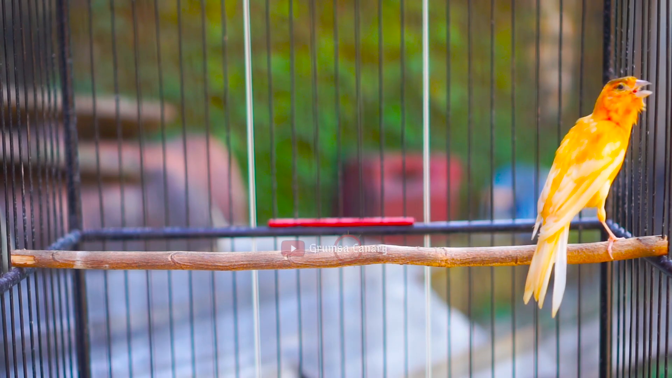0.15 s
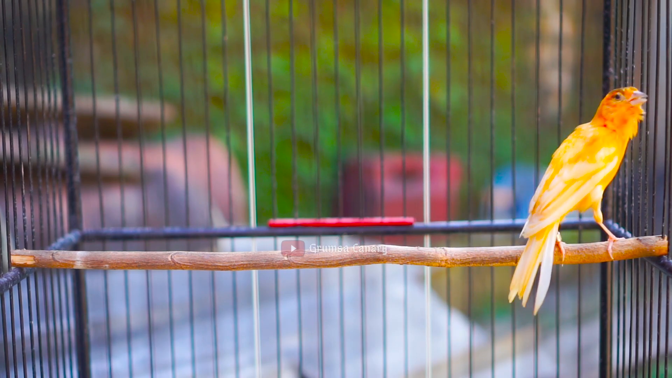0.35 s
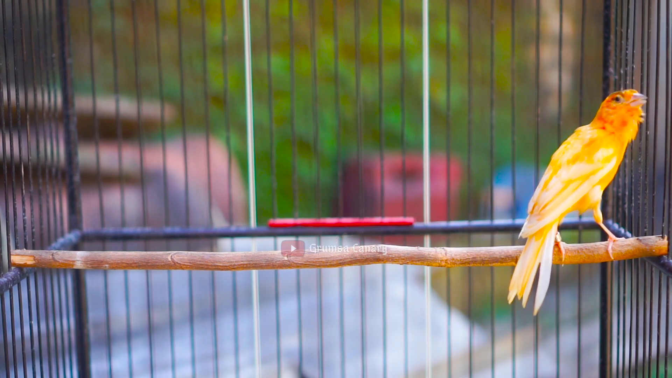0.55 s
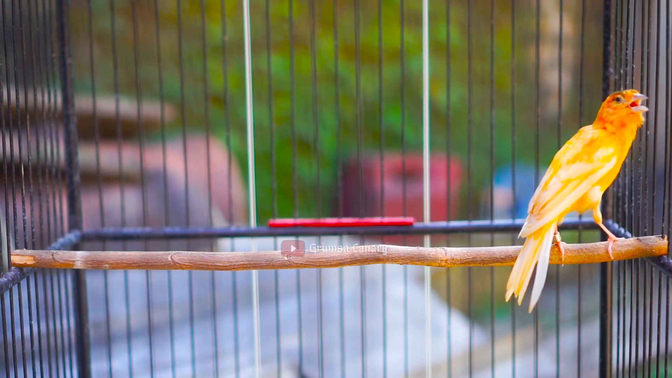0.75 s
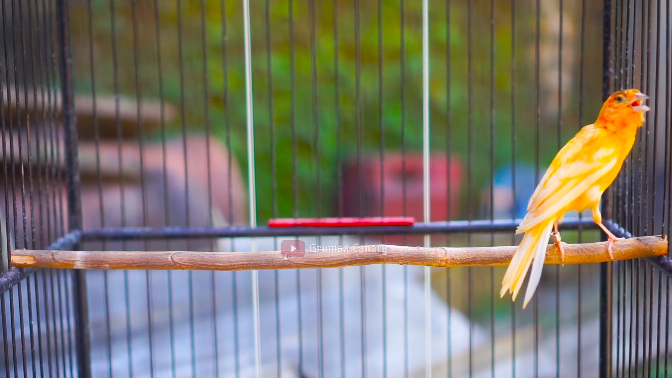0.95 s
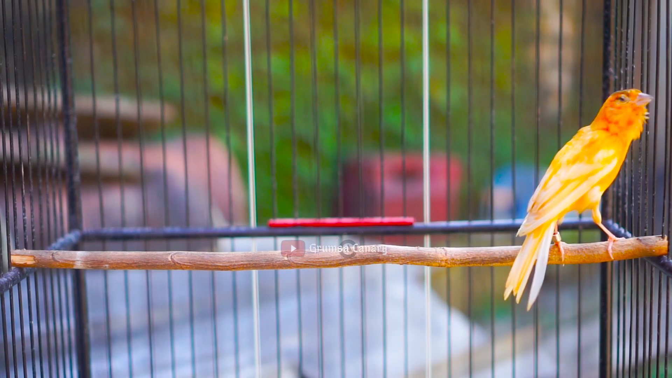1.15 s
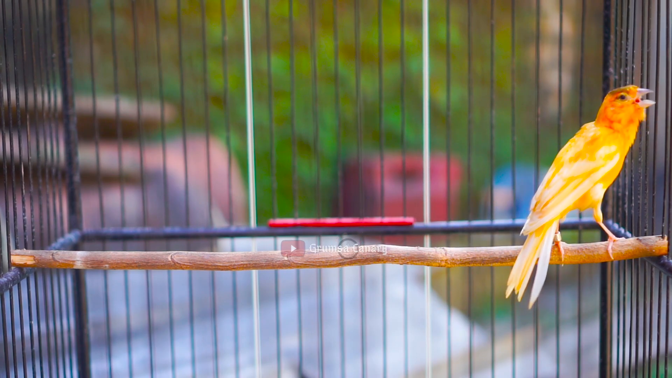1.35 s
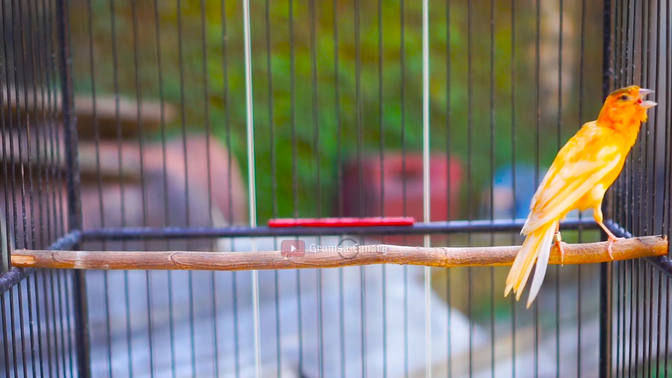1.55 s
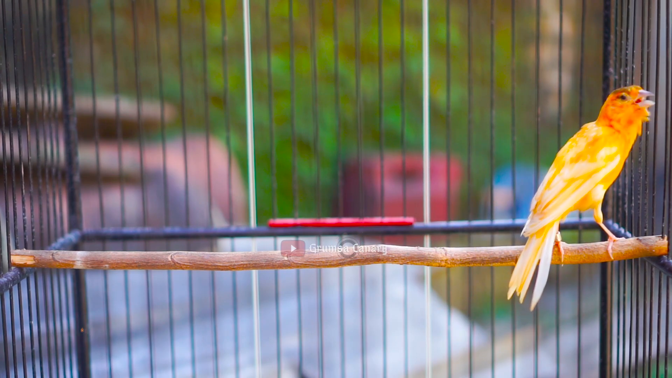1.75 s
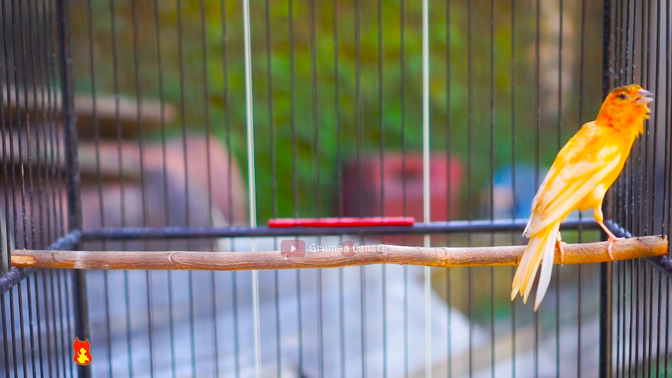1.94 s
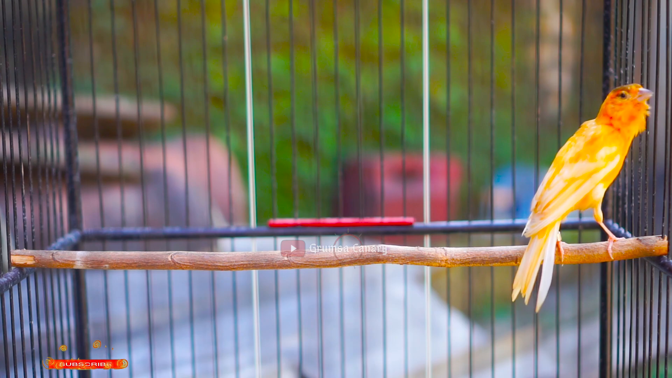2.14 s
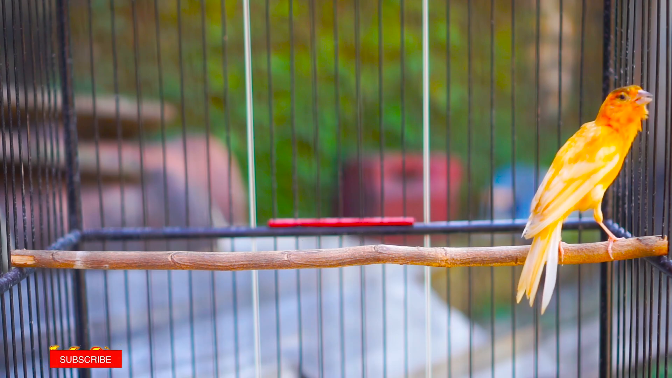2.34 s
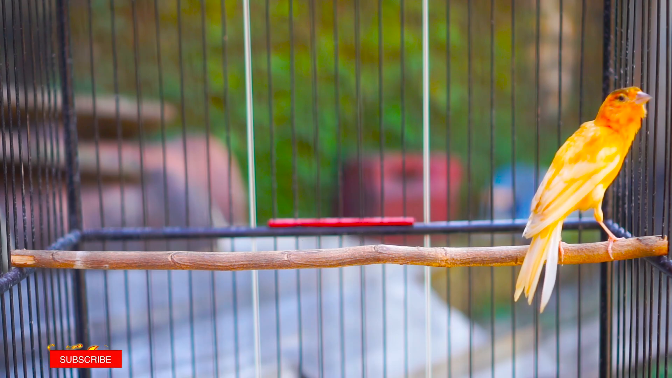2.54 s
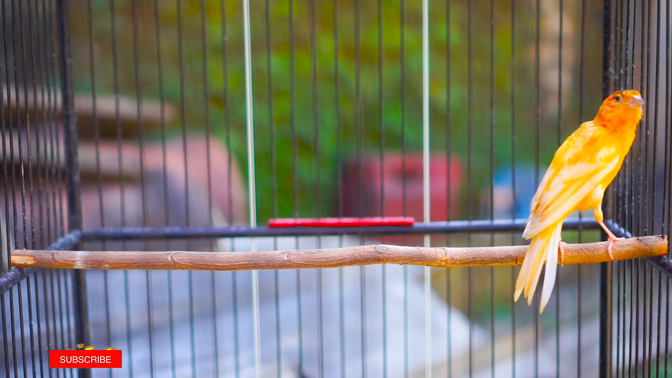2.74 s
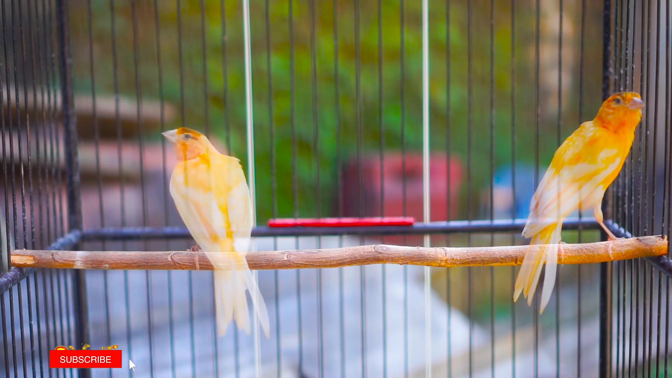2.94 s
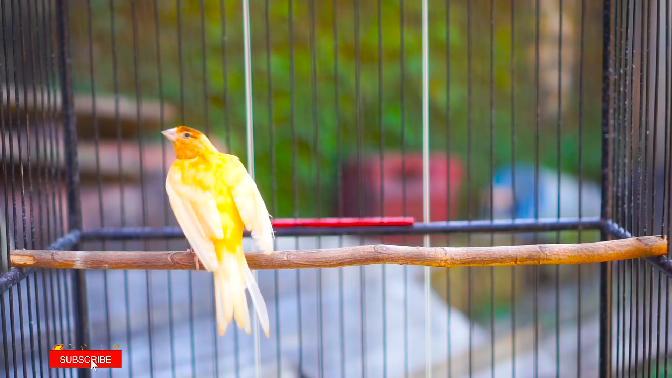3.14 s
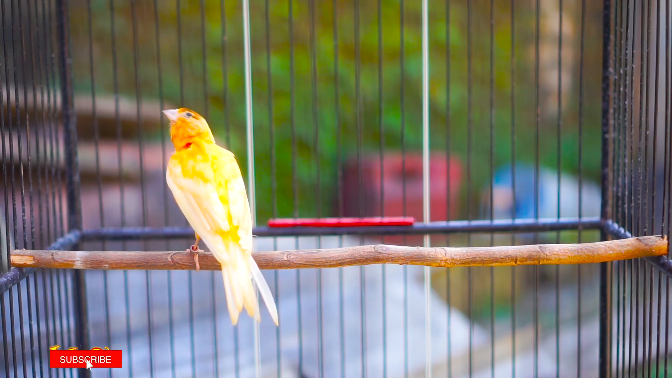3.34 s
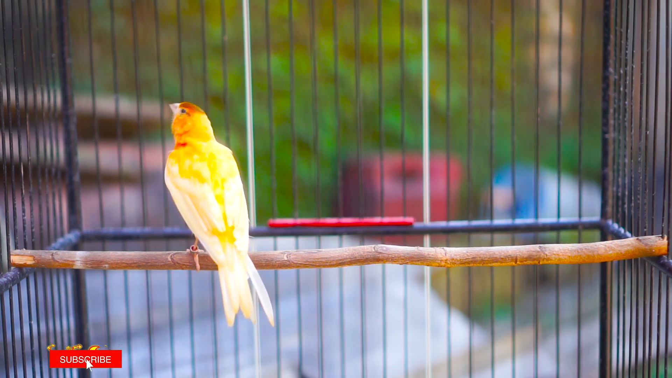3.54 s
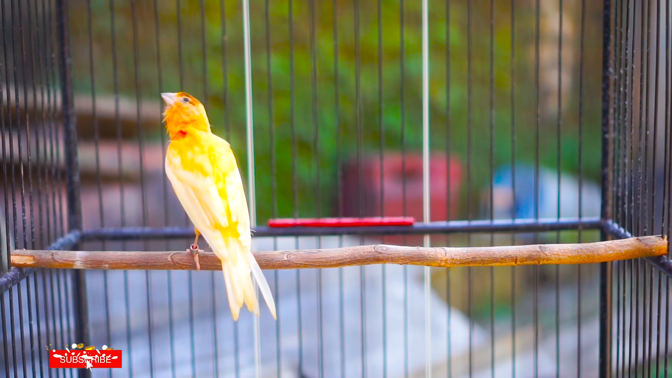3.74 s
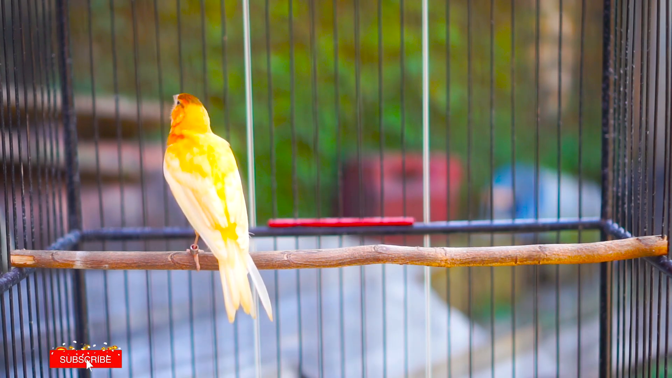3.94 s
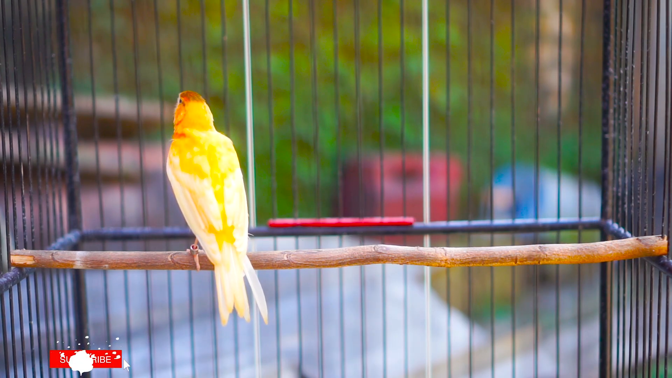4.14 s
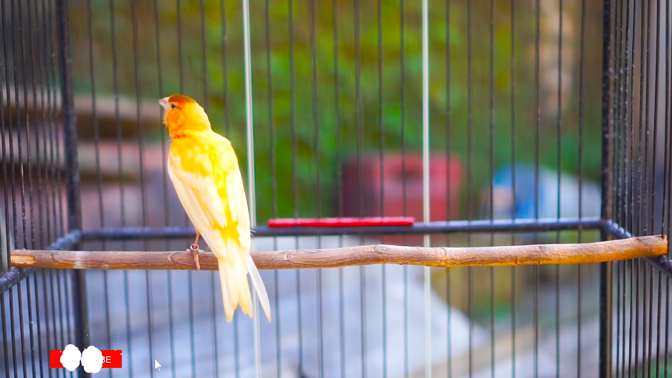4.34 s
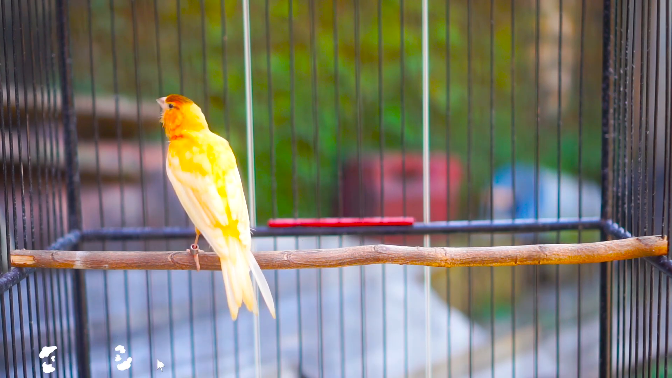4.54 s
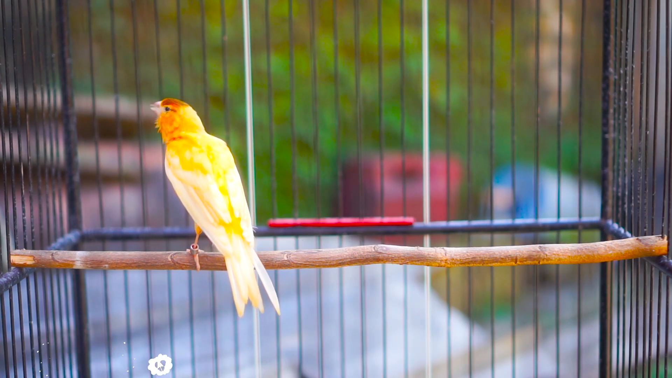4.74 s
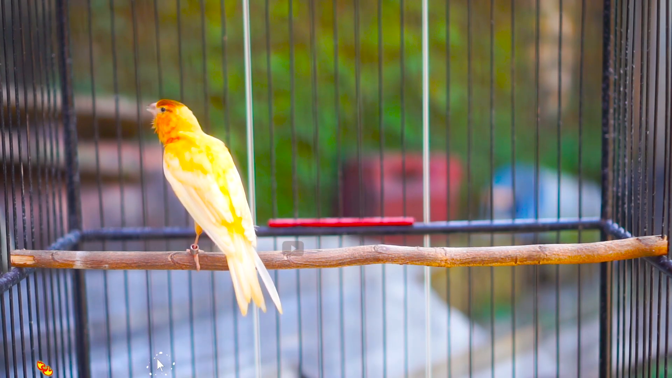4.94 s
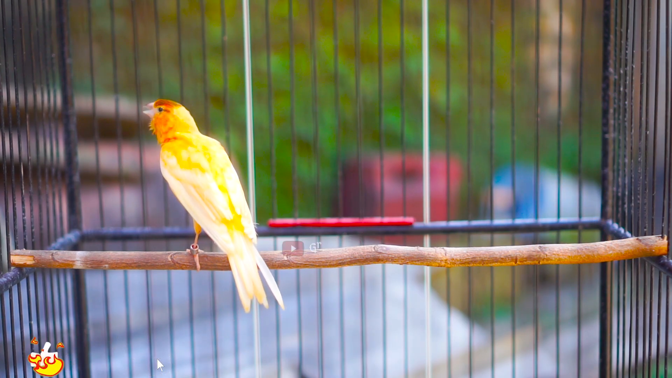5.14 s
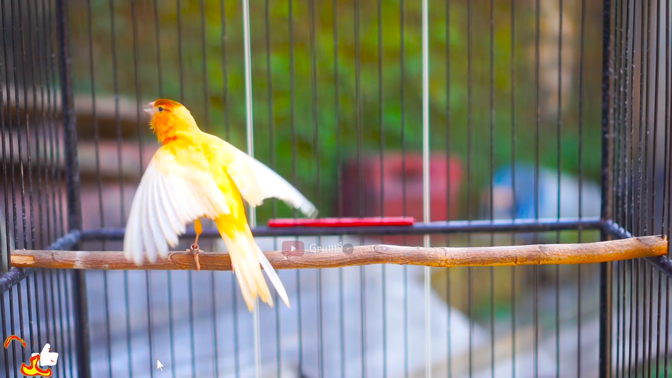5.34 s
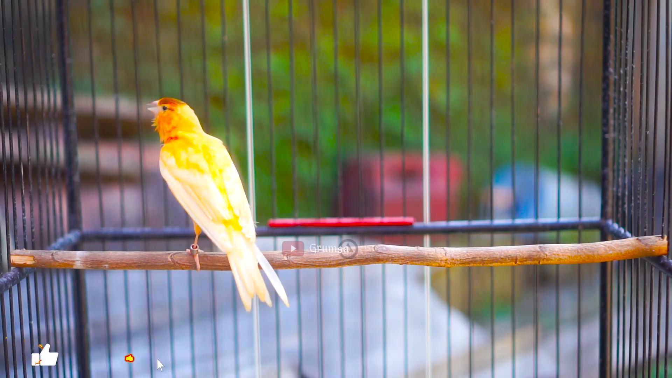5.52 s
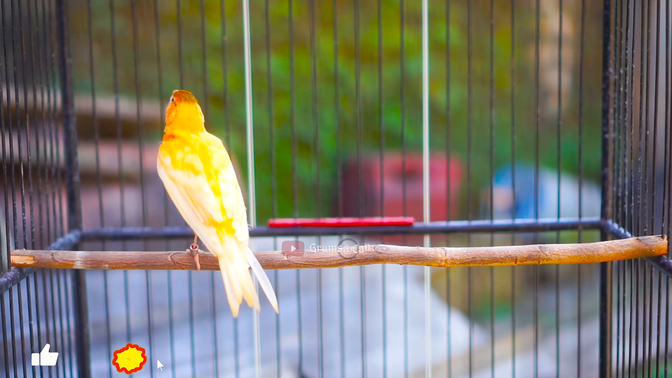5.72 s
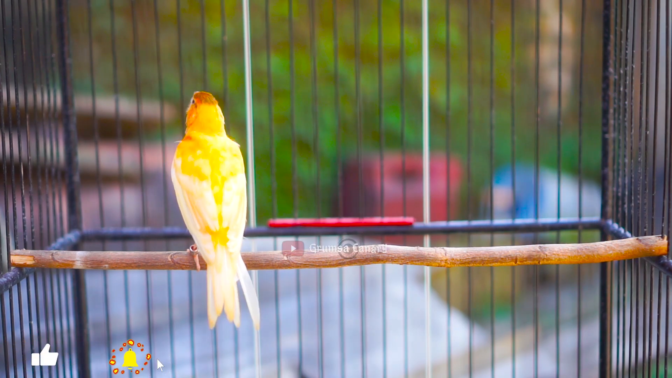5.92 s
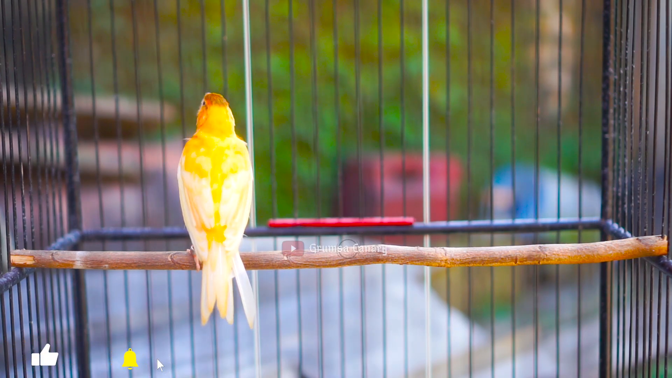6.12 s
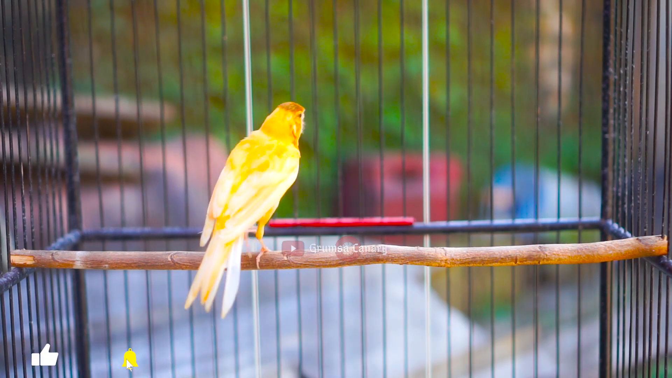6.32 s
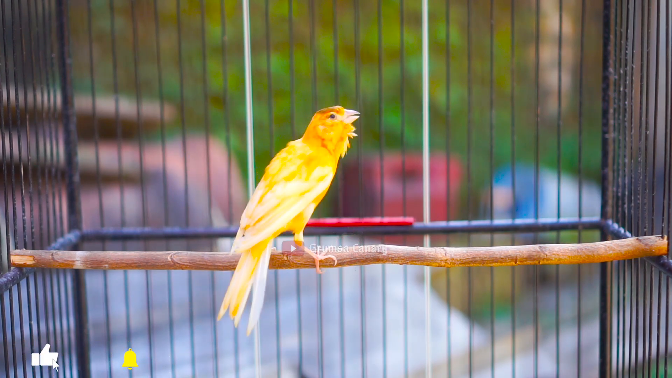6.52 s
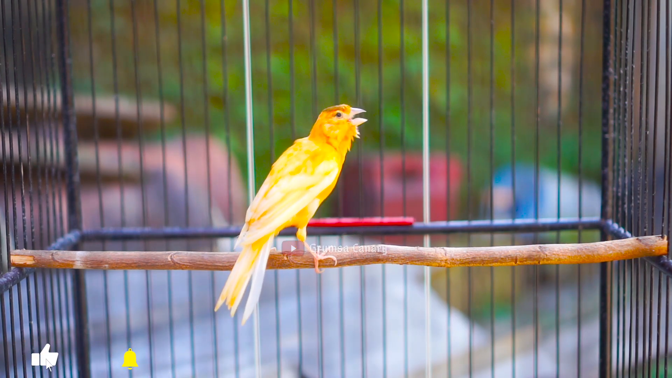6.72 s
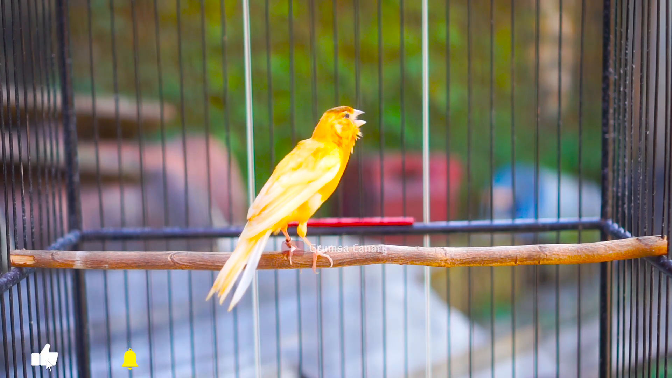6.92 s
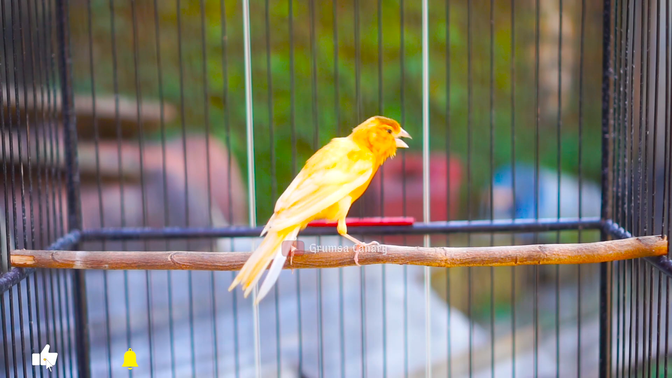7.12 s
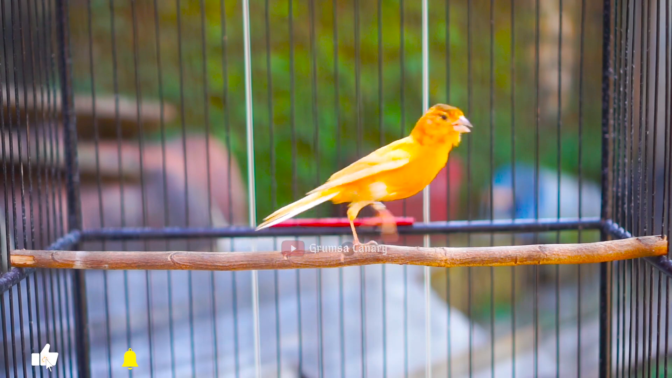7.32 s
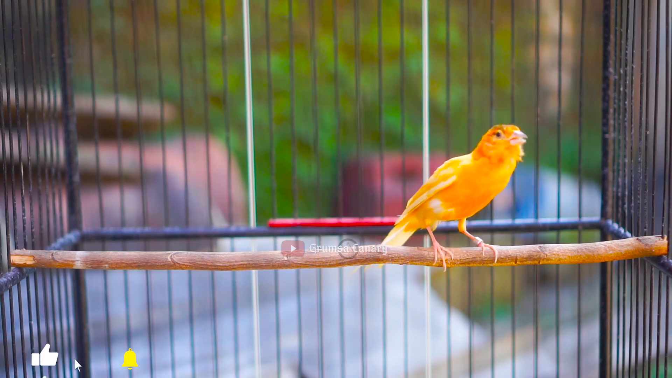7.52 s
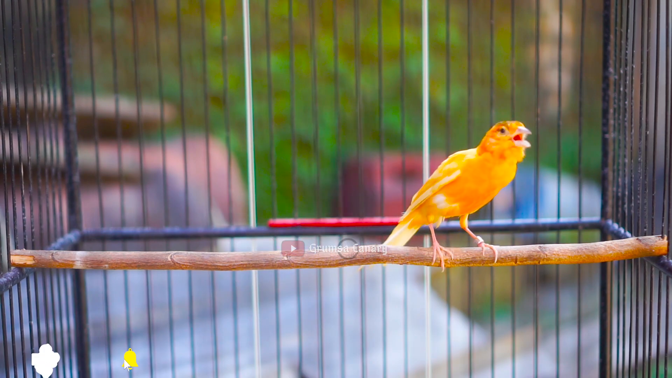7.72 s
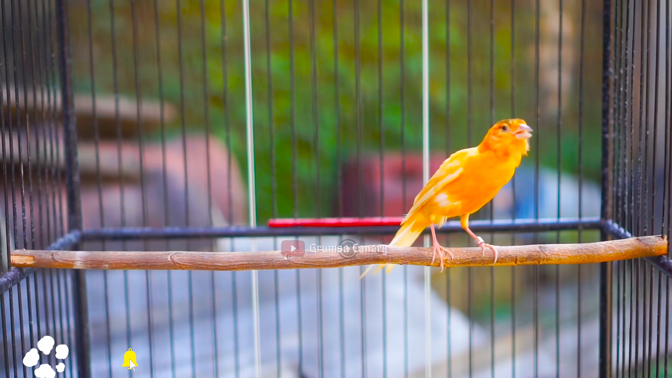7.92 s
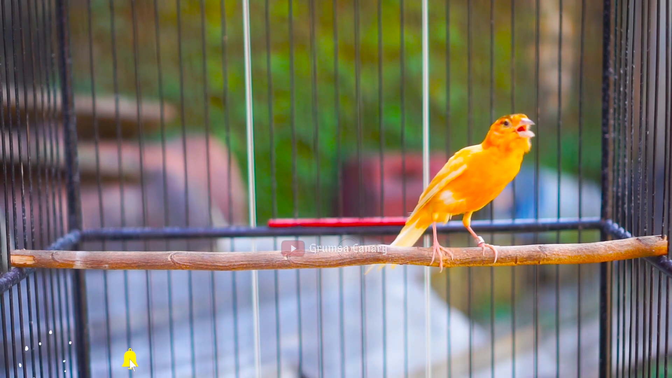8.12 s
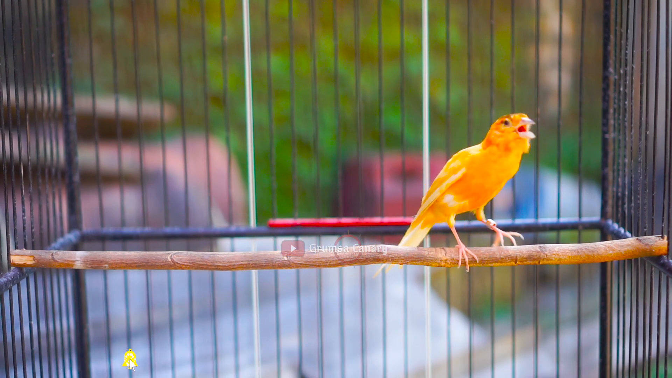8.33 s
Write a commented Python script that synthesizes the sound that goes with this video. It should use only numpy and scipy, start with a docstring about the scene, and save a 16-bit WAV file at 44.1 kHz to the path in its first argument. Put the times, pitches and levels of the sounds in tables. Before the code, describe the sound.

A canary close by sings loud, fast trills of falling chirps, pauses, then swells through a rapid ticking roll back into bright falling trills.

```python
"""Caged canary with a far bird

A caged canary sings close by: trills of falling sweeps, long slurs and rising whistles, a pause, then a
swelling roll of rising ticks and the falling trills again. Each syllable is a gliding sine with weak overtones,
comb-filtered by near reflections and convolved with decaying noise for the room. Another bird calls far off,
heard only as reverberation, over shaped noise: low rumble, hums, air, hiss and a passing rustle."""
import sys
import numpy as np
from scipy import signal
from scipy.fft import rfft, irfft, next_fast_len
from scipy.io import wavfile
from scipy.ndimage import uniform_filter1d, minimum_filter1d, map_coordinates

SR = 44100
rng = np.random.default_rng(int(sys.argv[2]) if len(sys.argv) > 2 else 0)


def digitize_waveform(pressure):
    """Quantize a signal to 16-bit integers and store it at the path in sys.argv[1].

    Rows of a 2-D input are taken as channels; values are limited to [-1, 1].
    """
    field = np.atleast_2d(pressure).T
    bounded = np.clip(field, -1, 1)
    quanta = np.round(bounded * 32767).astype(np.int16)
    wavfile.write(sys.argv[1], SR, quanta)


N = 369116


def canary():
    """Each posture aims the beak differently: its own balance, brightness and reflections."""
    # postures: (start [s], left-right [dB], greatest left-ear phase lead [rad], overtones [dB], room [dB])
    postures = [(0, -9, 0.67, -0.5, -12), (2.9, -2, 1.57, -8.5, -13), (5.46, -2.5, 1.27, 3, -12),
                (7.2, -5.5, 0.9, 2.5, -15)]
    # three near reflections per posture, one table per ear: (delay [ms], share) three times
    echoes_left = [(2.655, 0.17, 2.3, 0.079, 1.56, 0.16), (2.036, 0.45, 3.155, 0.1, 1.355, 0.13),
                   (1.535, 0.23, 1.8, 0.37, 0.975, 0.08), (0.89, 0.31, 1.56, 0.22, 2.3, 0.11)]
    echoes_right = [(1.55, 0.34, 2.93, 0.2, 0.995, 0.13), (2.05, 0.55, 1.24, 0.12, 3.215, 0.14),
                    (1.535, 0.38, 1.8, 0.49, 2.615, 0.082), (1.555, 0.26, 0.9, 0.13, 2.3, 0.2)]

    tone, overtones = song()
    t_s = np.arange(N) / SR
    # postures hand over within 10 ms
    begun = [1] + [np.clip((t_s - row[0]) * 100, 0, 1) for row in postures[1:]] + [0]
    direct, into_room, balance = 0, 0, 0
    for k, (_, pan_db, lead_rad, overtone_db, room_db) in enumerate(postures):
        share = begun[k] - begun[k + 1]
        voice = (tone + from_db(overtone_db) * overtones) * share
        left = near_echoes(voice, echoes_left[k], 0)
        right = near_echoes(voice, echoes_right[k], lead_rad)
        direct = direct + np.stack([left, right])
        into_room = into_room + from_db(room_db) * voice
        ears = from_db([[pan_db / 2], [-pan_db / 2]])
        balance = balance + share * ears / np.sqrt(np.mean(ears ** 2))
    reverb = room(into_room, early_t60_s=0.11, late_t60_s=0.33, late_db=-13.5, gap_s=0.0038)
    return balance * (direct + reverb)


def song():
    """Sing every phrase, tone and overtones apart; held whistles are steadier than sweeps."""
    # syllable gestures: (time from the syllable's centre [ms], pitch [Hz], level [dB])
    chip = [(-37, 6650, -48), (-32.5, 6410, -35.5), (-26.5, 5540, -17.5), (-18, 4806, -11.5),
            (-10.5, 4400, -11.5), (0, 3853, -1.5), (5.5, 3463, 0.5), (9.5, 3229, -6.5), (13, 3090, -24),
            (20, 3100, -40)]
    sweep = [(-58, 6200, -40), (-51.5, 7540, -35), (-44, 6550, -28.5), (-37.5, 6110, -17), (-25, 5320, -16),
             (-15.5, 4713, -16.5), (-7.5, 4476, -1), (0.5, 3980, -1), (8.5, 3480, -6), (16.5, 3090, -7.5),
             (24, 2690, -12.5), (28.5, 2614, -21.5), (33, 2560, -36.5)]
    swoop = [(-122, 7650, -40.5), (-108, 7340, -27), (-82, 7120, -21), (-56, 6450, -16.5),
             (-35.5, 5680, -9.5), (-10.5, 4600, -2), (2.5, 3890, -0.5), (8.5, 3330, -4.5),
             (13.5, 3177, -11), (24, 3000, -34.5)]
    slur = [(-163, 7750, -47.5), (-146, 7600, -28.5), (-118, 7100, -16.5), (-82.5, 6580, -12.5),
            (-42, 5850, -13), (-24.5, 5130, -2.5), (-10.5, 4570, -1), (0, 3860, 1.5), (6.5, 3310, -3.5),
            (11.5, 3134, -14), (23.5, 3090, -38.5)]
    lift = [(-30.5, 2950, -27), (-20.5, 3320, -3), (-9.5, 3720, -5.5), (2.5, 4120, -0.5), (18, 4530, -2.5),
            (40, 4830, -11), (69.5, 5060, -18.5), (95, 5250, -26.5), (119, 5300, -42)]
    whistle = [(-59.5, 1900, -36), (-47, 2430, -24.5), (-36.5, 3030, -10), (-18.5, 3610, -5),
               (1, 4080, -2.5), (22, 4450, -5.5), (38.5, 4730, -1), (57, 4990, -10.5), (108, 5050, -8),
               (136, 5070, -16.5), (152.5, 5040, -29.5)]
    tick = [(-19.5, 1800, -36), (-12, 2820, -26), (-6, 3350, -3.5), (0.5, 3877, 2.5), (4, 4394, -3),
            (8, 4550, -7.5), (11, 4650, -30)]
    pip = [(-29.5, 1500, -49.5), (-18.5, 2830, -33), (-10.5, 3330, -11), (-7, 3680, -5.5), (-0.5, 4200, 0),
           (5, 4480, 3.5), (8, 4625, -2.5), (12, 4550, -25.5)]
    # syllables sung singly: (centre [s], level [dB], length [share of the gesture's])
    swoops = [(1.5258, -6, 1.0), (8.007, -5.5, 0.89)]
    slurs = [(1.747, -7.5, 1), (8.2252, -6.5, 0.99), (8.438, -4, 0.99)]
    lifts = [(1.825, -11.5, 1)]
    whistles = [(2.0343, -10.5, 0.94), (2.271, -9, 0.97)]
    # trills and rolls: (time [s], syllable spacing [ms], level [dB], length [share of the gesture's])
    opening_chips = [(0.043, 75, -5.5, 1.02), (0.4291, 78.8, -5, 0.94)]
    opening_sweeps = [(0.521, 103.3, -7, 0.74), (0.735, 112.2, -5, 1), (1.092, 126.9, -5, 0.98),
                      (1.335, 118.2, -5, 1)]
    tick_roll = [(3.397, 35.2, -49, 1.0), (3.44, 35.34, -37, 0.98), (3.6, 35.34, -28, 0.9),
                 (3.93, 35.71, -18, 0.62), (4.33, 38.87, -18.5, 0.8), (4.5, 43.76, -16.5, 0.85),
                 (4.735, 46.76, -14, 0.95)]
    pip_roll = [(4.785, 44.77, -13.5, 0.85), (4.88, 54.86, -12, 0.84), (5.05, 57.2, -11, 0.87),
                (5.3996, 58.3, -10.5, 0.93)]
    closing_chips = [(5.536, 78.35, -12, 1.07), (5.69, 75.17, -6.5, 0.98), (6.2, 74.54, -4.5, 1.02),
                     (6.843, 81.23, -4, 1.023)]
    closing_sweeps = [(6.9257, 99, -4, 0.83), (7.17, 117.5, -4, 1.014), (7.38, 112, -4.5, 0.99),
                      (7.8323, 118.1, -5, 1.04)]

    # pitch waver and spread as shares of the pitch
    chipping = dict(waver=0.008, flutter_db=1.26, spread=0.01, second_db=8.5)
    falling = dict(waver=0.0059, flutter_db=1.17, spread=0.0052, second_db=1.5)
    held = dict(waver=0.0017, flutter_db=1.0, spread=0.00091, second_db=2.0)
    rolling = dict(waver=0.006, flutter_db=0.77, spread=0.009, second_db=21.5)
    # (gesture, syllables, manner, overtones [dB])
    phrases = [
        (chip, trill(opening_chips), chipping, -4),
        (sweep, trill(opening_sweeps), falling, 1),
        (swoop, swoops, falling, 4),
        (slur, slurs, falling, 4),
        (lift, lifts, held, 1),
        (whistle, whistles, held, 4),
        (tick, trill(tick_roll), rolling, -6.5),
        (pip, trill(pip_roll), rolling, -7.5),
        (chip, trill(closing_chips), chipping, -1.5),
        (sweep, trill(closing_sweeps), falling, -1),
    ]
    tone, overtones = np.zeros(N), np.zeros(N)
    for gesture, notes, manner, bright_db in phrases:
        for centre_s, db, stretch in notes:
            start = round((centre_s + stretch * gesture[0][0] / 1000) * SR)
            pure, bright = syllable(gesture, stretch, **manner)
            add(tone, start, from_db(db) * pure)
            add(overtones, start, from_db(db + bright_db) * bright)
    return tone, overtones


def trill(rows):
    """Repeat a syllable at a smoothly changing pace: (centre s, level dB, length share) for each one."""
    uneven_db, uneven_length = 0.5, 0.015  # chance differences between syllables
    s, spacing_ms, db, length = np.transpose(rows)
    t_s = np.linspace(s[0], s[-1], num=2000)
    # syllables counted so far: the integral of the pace
    beats = np.cumsum(1000 * (t_s[1] - t_s[0]) / np.interp(t_s, s, spacing_ms))
    whole_beats = np.linspace(beats[0], beats[-1], round(beats[-1]) + 1)
    centres_s = np.interp(whole_beats, beats, t_s)
    chance = rng.standard_normal((len(centres_s), 2))
    levels_db = np.interp(centres_s, s, db) + uneven_db * chance[:, 0]
    lengths = np.interp(centres_s, s, length) * (1 + uneven_length * chance[:, 1])
    return np.column_stack([centres_s, levels_db, lengths])


def syllable(gesture, stretch, waver, flutter_db, spread, second_db):
    """One glide of the syrinx, never twice quite the same: its tone and its overtones."""
    # relative levels of the syrinx's overtones from the second harmonic up: (level [dB])
    overtone_levels = [-37, -31, -42, -47.5]
    # how the open beak radiates overtones: (frequency [Hz], gain [dB])
    beak = [(4000, -29.5), (7800, -28.5), (9200, -14.5), (10400, -7), (12500, 0.5), (14000, 0.5),
            (15300, 4)]

    ms, hz, db = np.transpose(gesture)
    t_ms = np.arange(ms[0], ms[-1], 1000 / SR / stretch)  # gesture time, before stretching
    size = len(t_ms)
    pitch_hz = uniform_filter1d(np.interp(t_ms, ms, hz), size=90, mode="nearest")
    pitch_hz = pitch_hz * (1 + spread * rng.standard_normal() + waver * wander(size, 220))
    # the valve opens and shuts smoothly
    opening = signal.windows.tukey(size, 220 / size)
    level_db = np.interp(t_ms, ms, db) + flutter_db * wander(size, 154.3)
    level = opening * uniform_filter1d(from_db(level_db), size=110)
    phase = 2 * np.pi * np.cumsum(pitch_hz) / SR
    overtones = 0
    for k, overtone_db in enumerate(overtone_levels, 2):
        extra_db = second_db if k == 2 else 0
        gain = from_db(overtone_db + extra_db + at_hz(beak, k * pitch_hz) + 4 * wander(size, 133.9))
        below_nyquist = np.interp(k * pitch_hz, [17000, 21000], [1, 0])
        overtones = overtones + gain * below_nyquist * np.sin(k * phase)
    return level * np.sin(phase), level * overtones


def near_echoes(x, echoes, lag_rad):
    """The path to one ear: reflections a few ms late beat against the glide and cut each syllable into lobes."""
    # interaural phase, strongest in the song's range: (frequency [Hz], share of lag_rad)
    lead_shape = [(1000, 0.74), (3300, 0.99), (4500, 0.92), (6000, 0.88), (11000, 0.45)]

    size = next_fast_len(N + 1024)
    hz = np.fft.rfftfreq(size, 1 / SR)
    turn_per_ms = -2j * np.pi * hz / 1000
    pairs = np.reshape(echoes, (-1, 2))
    comb = 1 + sum(share * np.exp(turn_per_ms * delay_ms) for delay_ms, share in pairs)
    lag = np.exp(-1j * lag_rad * at_hz(lead_shape, hz))
    heard = irfft(rfft(x, size) * comb * lag, size)[:N]
    return heard / np.sqrt(1 + np.sum(pairs[:, 1] ** 2))


def room(x, early_t60_s, late_t60_s, late_db, gap_s):
    """Dense quick reflections, then a weaker, longer tail; each ear has its own decaying noise."""
    # room's response: (frequency [Hz], gain [dB])
    room_colour = [(2000, 4), (3200, 3), (4500, 1), (6000, 4), (9000, 5.5), (12000, 7.5), (16000, 7)]

    t_s = np.arange(SR // 2) / SR
    decay = from_db(-60 * t_s / early_t60_s) + from_db(late_db - 60 * t_s / late_t60_s)
    response = rng.standard_normal((2, len(t_s))) * decay * (t_s > gap_s)
    response /= np.sqrt(np.sum(response ** 2, axis=1, keepdims=True))  # unit energy
    return signal.fftconvolve(colour(x, room_colour)[None], response, axes=1)[:, :N]


def far_bird():
    """Falling whistles that arrive only as reverberation."""
    # calls: (start [s], end [s], first pitch [Hz], last pitch [Hz], level into the room [dB])
    far_calls = [(2.3, 2.8, 2800, 2680, -64.5), (3.048, 3.113, 4980, 2740, -59.5),
                 (3.163, 3.235, 4870, 2810, -61), (3.288, 3.357, 4800, 2820, -58.5),
                 (5.989, 6.314, 3105, 2780, -48.5), (6.862, 7.104, 2664, 2090, -46),
                 (7.115, 7.36, 2860, 2400, -41), (7.295, 7.6, 2340, 1963, -56)]

    calls = np.zeros(N)
    for start_s, end_s, first_hz, last_hz, db in far_calls:
        size = max(int((end_s - start_s) * SR), 2)
        pitch_hz = np.linspace(first_hz, last_hz, size) * (1 + 0.027 * wander(size, 150))
        whistle = signal.windows.tukey(size, 0.5) * np.sin(2 * np.pi * np.cumsum(pitch_hz) / SR)
        add(calls, int(start_s * SR), from_db(db) * whistle)
    return room(calls, early_t60_s=0.28, late_t60_s=0.81, late_db=-3.5, gap_s=0.0017)


def background():
    """Noise layers: a low rumble with swells, hums, air, thin high hiss and a soft treble rustle behind the roll."""
    # relative noise spectra: (frequency [Hz], density [dB per Hz])
    rumble_colour = [(25, -33.5), (45, -21.5), (65, -9), (90, 4.5), (130, 3.5), (200, -6.5), (300, -24.5),
                     (600, -72)]
    air_colour = [(100, -25), (180, -3), (260, -6.5), (380, -7), (500, -8), (850, -9), (1150, -14.5),
                  (1450, -9.5), (2000, -14.5), (3500, -14), (6000, -23), (15700, -35)]
    hiss_colour = [(1000, -19), (5000, -7.5), (9000, -3.5), (12000, 1.5), (15500, -2.5)]
    rustle_colour = [(1800, -35.5), (3000, 0.5), (4600, 2), (6300, -12), (7200, -23.5), (12000, -25)]
    # levels within each layer's band: (time [s], level [dB])
    rumble_level = [(0, -76), (0.8, -76.5), (1.2, -90.5), (1.95, -87), (2.08, -71.5), (3.0, -67.5),
                    (5.5, -68.5), (8.37, -76)]
    air_level = [(0, -64.5), (1.24, -67), (2.7, -62), (5.3, -62), (5.8, -65), (7.15, -63), (8.37, -69)]
    hiss_level = [(0, -76), (2.95, -78.5), (3.02, -72), (8.37, -72.5)]
    rustle_level = [(3.75, -88), (3.83, -49), (3.95, -45), (4.1, -58), (4.35, -62), (4.6, -91)]

    rumble = (over_time(rumble_level) + swells()) * steady_noise(rumble_colour, (40, 200))
    air = over_time(air_level) * steady_noise(air_colour, (220, 1600))
    air = air * from_db([[-2.5], [0]])  # weaker on the left
    hiss = over_time(hiss_level) * steady_noise(hiss_colour, (9000, 15000))
    rustle = over_time(rustle_level) * steady_noise(rustle_colour, (2000, 7000))
    return rumble + hums() + air + hiss + rustle


def swells():
    """Gain of the dull low swells in the rumble: each rises and falls as a Hann window."""
    # swells: (centre [s], length [s], peak [dB])
    low_swells = [(0.14, 0.14, -61), (0.32, 0.19, -61.5), (0.48, 0.12, -67), (2.466, 0.3, -57.5),
                  (2.679, 0.16, -58.5), (4.97, 0.2, -56.5), (5.33, 0.25, -67), (6.238, 0.5, -68)]

    gain = np.zeros(N)
    for centre_s, length_s, db in low_swells:
        shape = signal.windows.hann(int(length_s * SR))
        add(gain, int((centre_s - length_s / 2) * SR), from_db(db) * shape)
    return gain


def hums():
    """Steady low resonances of the surroundings: narrow bands of noise, the same in both ears."""
    # resonances: (frequency [Hz], width at half amplitude [Hz], rms level [dB])
    resonances = [(98, 14, -86), (234, 16, -71.5), (299, 12, -79), (496.4, 20, -76.5), (756.6, 14, -81),
                  (855, 18, -84)]

    f, out = np.fft.rfftfreq(N, 1 / SR), 0
    white = rfft(rng.standard_normal(N))
    for hz, width_hz, db in resonances:
        band = irfft(white / (1 + ((f - hz) / width_hz * 2) ** 2), N)
        out = out + from_db(db) * band / np.std(band)
    return out


def steady_noise(spectrum, band_hz):
    """Stereo noise, alike in the bass and unrelated in the treble; the mid has rms 1 within the band."""
    # left-right likeness: (frequency [Hz], correlation)
    likeness = [(60, .96), (150, .9), (300, .55), (600, .1), (2000, 0)]

    hz = np.fft.rfftfreq(N, 1 / SR)
    mid, side = rfft(rng.standard_normal((2, N))) * from_db(at_hz(spectrum, hz))
    alike = np.clip(at_hz(likeness, hz), -1, 1)
    mid, side = mid * np.sqrt(1 + alike), side * np.sqrt(1 - alike)
    in_band = (hz > band_hz[0]) * (hz < band_hz[1])
    return irfft(mid + side * [[1], [-1]], N) / np.std(irfft(mid * in_band, N))


def over_time(rows):
    """Join the points of a level curve in dB and turn them into a gain."""
    s, db = np.transpose(rows)
    return from_db(np.interp(np.arange(N) / SR, s, db))


def from_db(db):
    """Decibels to gain."""
    return 10 ** (np.asarray(db) / 20)


def at_hz(points, hz):
    """Read a curve on a log-frequency axis."""
    f, value = np.transpose(points)
    return np.interp(np.log(np.maximum(hz, 1)), np.log(f), value)


def wander(size, per_s):
    """Smooth chance about 0: a spline through per_s normal draws a second."""
    steps = np.arange(size) * per_s / SR
    draws = rng.standard_normal(int(steps[-1]) + 3)
    return map_coordinates(draws, [steps], order=3, mode="nearest")


def colour(x, spectrum):
    """Give a signal a spectral shape."""
    hz = np.fft.rfftfreq(x.shape[-1], 1 / SR)
    return irfft(rfft(x) * from_db(at_hz(spectrum, hz)), x.shape[-1])


def add(track, start, sound):
    """Mix a sound into a track from a sample on, clipped to the track's ends."""
    low, high = max(start, 0), min(start + len(sound), N)
    if high > low:
        track[low:high] += sound[low - start:high - start]


def scene():
    """The singer, the far bird and the background."""
    return canary() + far_bird() + background()


def record(dry):
    """A fast limiter holds the peaks under full scale; the top is cut steeply."""
    cutoff_hz = 15850
    headroom = np.minimum(1, 0.95 / (np.abs(dry).max(axis=0) + 1e-6))
    gain = uniform_filter1d(minimum_filter1d(headroom, size=221), size=221)  # 5 ms windows
    low_pass = signal.ellip(12, 0.1, 80, cutoff_hz, fs=SR, output="sos")
    return signal.sosfilt(low_pass, dry * gain)


dry = scene()
out = record(dry)
digitize_waveform(out)
```